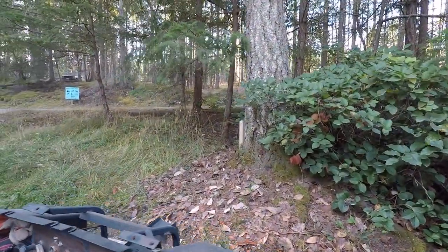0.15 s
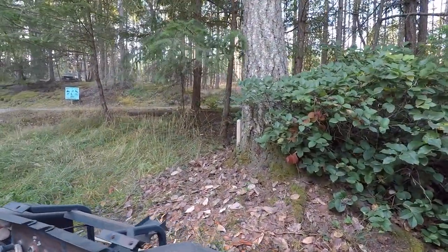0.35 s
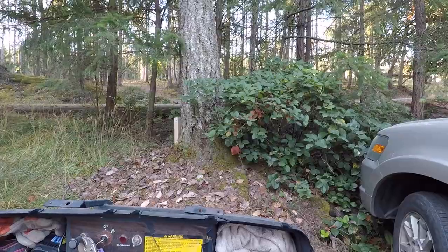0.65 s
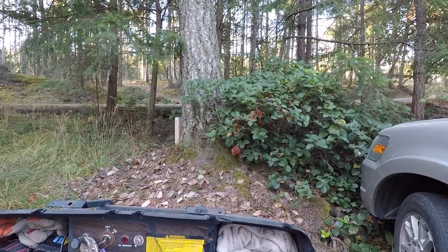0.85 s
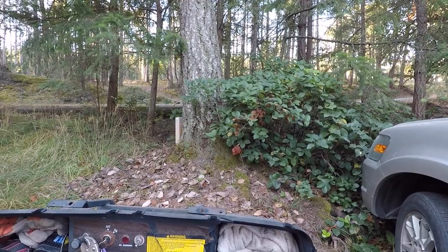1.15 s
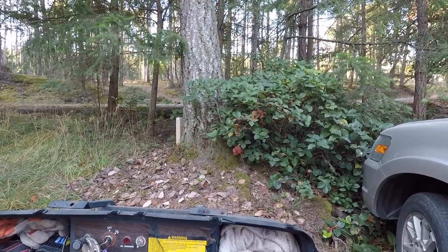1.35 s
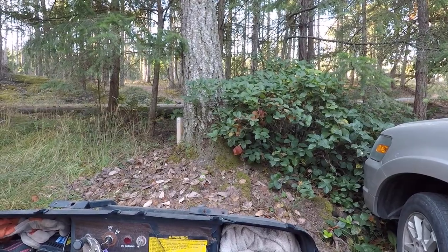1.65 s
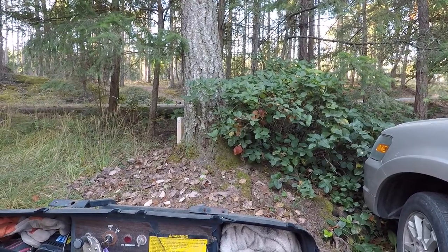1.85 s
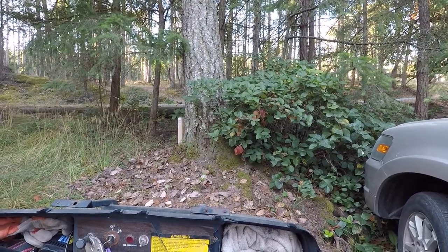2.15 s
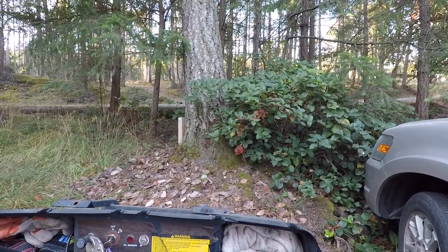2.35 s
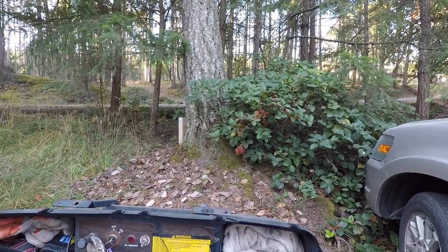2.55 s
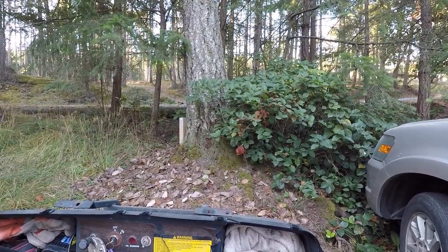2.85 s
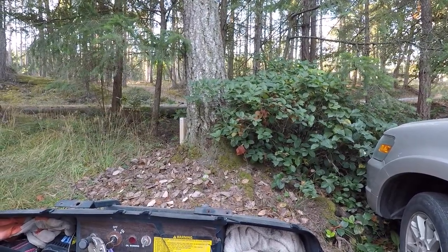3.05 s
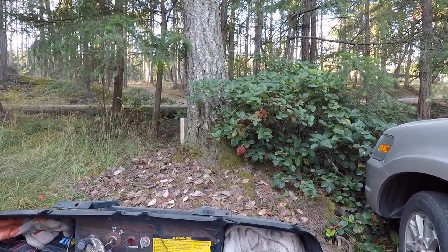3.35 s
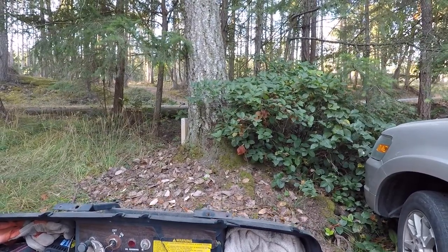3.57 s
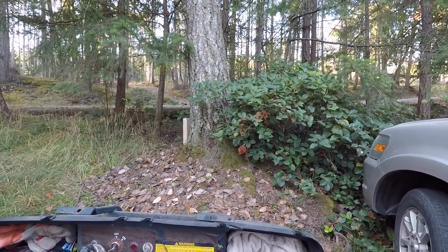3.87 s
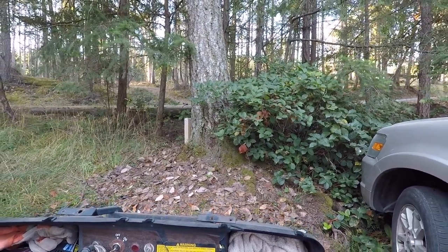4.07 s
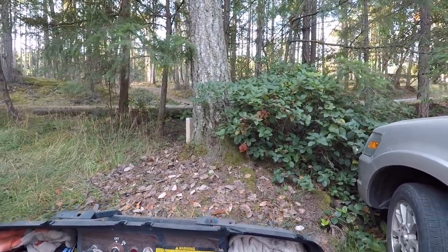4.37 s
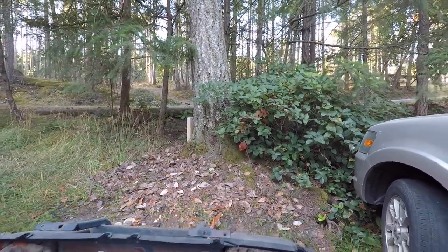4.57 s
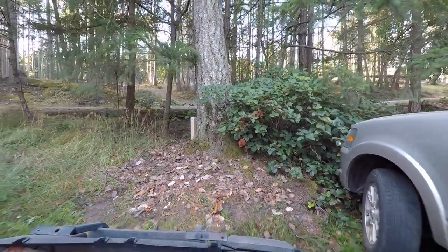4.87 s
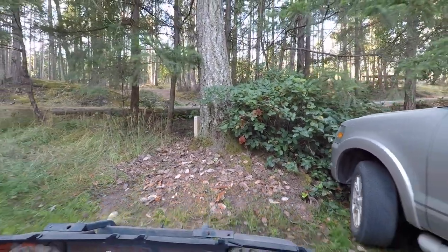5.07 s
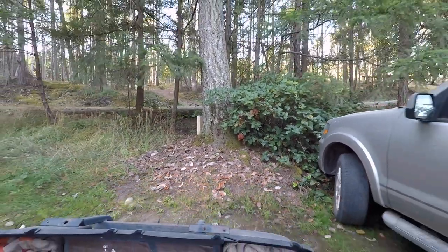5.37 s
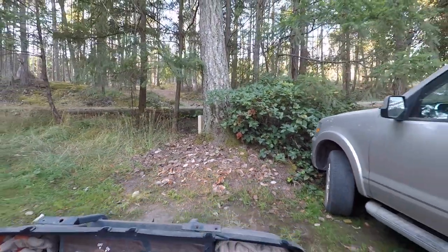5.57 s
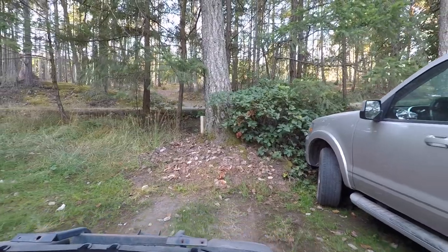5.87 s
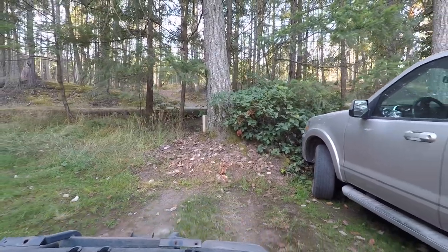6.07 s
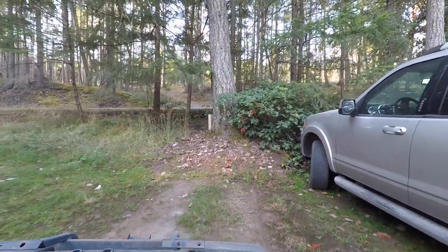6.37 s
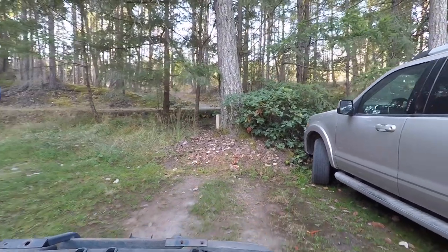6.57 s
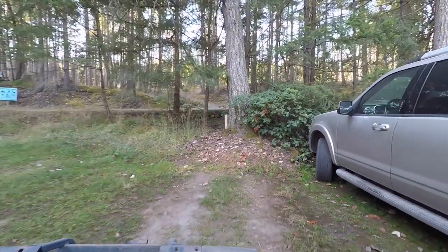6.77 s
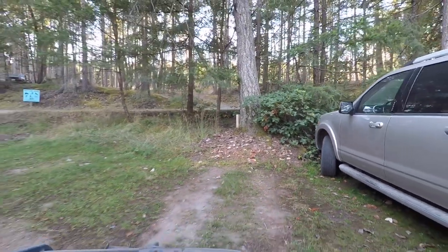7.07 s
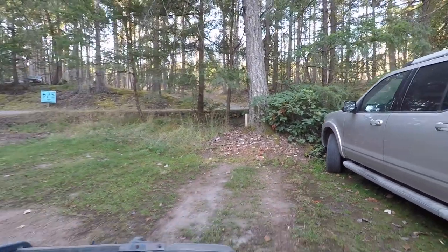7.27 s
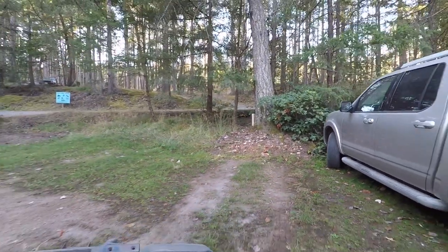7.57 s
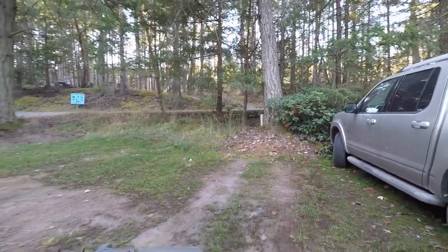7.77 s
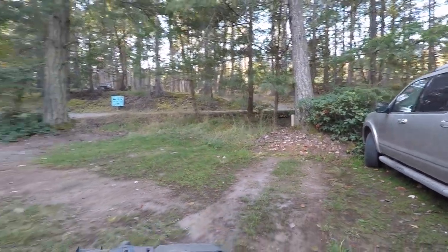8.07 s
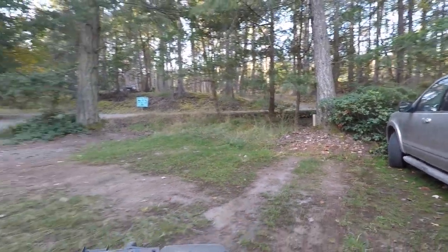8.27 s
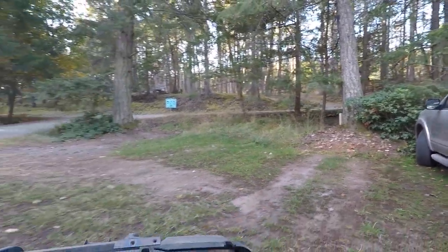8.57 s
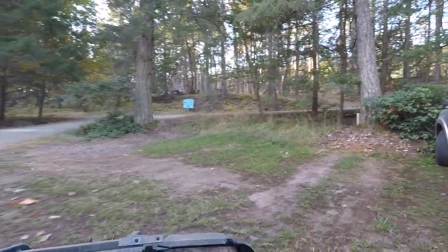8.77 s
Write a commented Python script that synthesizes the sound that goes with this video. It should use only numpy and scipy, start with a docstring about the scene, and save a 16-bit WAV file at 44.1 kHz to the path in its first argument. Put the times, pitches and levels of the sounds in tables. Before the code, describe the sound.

On-board, close stereo perspective on an electric cart in the woods. From 0 s a thin, wavering motor tone around 1 kHz hums quietly over faint low rumble. A soft thump at 0.6 s leads into hard clacks at 0.7 and 0.8; dull thumps follow at 1.1, 1.3 and 1.65. A short grinding whirr rises to a catch at 1.77, with another clack at 1.93. More thump and clacks come at 2.45-2.65, then a smoother whirr around 2.9. From 3 to 4.2 s the cart rolls off the bank: rapid knocks, bass jolts, cracking twigs, jingling fittings and hollow panel bonks, loudest near 4.05 and 4.5, with a panel shudder between. The motor fades by 5 s. A strong, uneven low rumble with gritty tyre scrub continues, easing after 7.3. Dry bright ticks run five per second from 4.25, every third stronger. Light plastic knocks come at 7.5-8.5; rumble softens to 8.9 s.

```python
"""A leafy bank beside a dirt track: an electric golf cart backs off the bank, heard from on board.
The motor, steady tones and housing resonances, sings under load; the drive takes up its slack in
thumps and clacks, made of damped frame modes. Then the cart rolls: shaped noise rumbles and crunches,
loose fittings rattle as bursts of bright noise, and something ticks in even time."""
import sys
import numpy as np
from scipy import signal
from scipy.fft import rfft, irfft, next_fast_len
from scipy.io import wavfile
from scipy.ndimage import uniform_filter1d, minimum_filter1d

SR = 44100
rng = np.random.default_rng(int(sys.argv[2]) if len(sys.argv) > 2 else 0)


def inscribe(sig):
    """Save sig as 16-bit PCM at rate SR to the path in sys.argv[1].

    A 1-D sig is mono; a 2-D sig holds one channel per row.
    Samples are clipped to [-1, 1] before scaling.
    """
    pcm = np.round(np.clip(np.atleast_2d(sig).T, -1, 1) * 32767)
    wavfile.write(sys.argv[1], SR, pcm.astype(np.int16))


N = 393327
TIME = np.arange(N) / SR

# The ride: (time [s], shaking of the chassis [dB], scrub of the tyres [dB])
RIDE = [(0, -31.5, -58.5), (0.399, -33, -58.5), (1.5, -29.5, -57), (1.849, -25, -49), (2.25, -31.5, -58.5),
        (2.799, -27.5, -55), (3.1, -19, -52), (4.18, -21, -49.5), (4.351, -16, -43.5),
        (4.548, -14.5, -47.5), (4.751, -16.5, -47.5), (5.7, -15, -51.5), (6.301, -15.5, -51),
        (7.349, -17, -57), (7.7, -19, -63), (8.5, -19, -60.5), (8.92, -22.5, -65)]
CRUISE_SHAKE_DB, CRUISE_SCRUB_DB = -15, -50
ROLL_START_S = 3.05  # chance hits from the ground begin here
# Blows on the frame: (time [s], relative level [dB], hardness [0 soft thump to 1 sharp clack],
# rattle of the fittings [dB])
BLOWS = [(0.567, -6.5, 0.044, -46.5), (0.696, -5, 0.86, -56), (0.791, -6, 0.76, -45),
         (0.907, -21.5, 0.32, -67), (1.144, -6.5, .02, -46), (1.34, -4.5, 0.062, -43.5),
         (1.648, -5.5, 0.027, -43), (1.705, -16.5, 1, -58), (1.769, -3.5, 0.65, -55.5),
         (1.93, -6, 0.89, -44.5), (2.451, -7, 0.05, -46), (2.585, -6.5, 0.82, -53), (2.646, -6, 0.8, -42.5),
         (2.809, -16, 0.33, -53), (3.134, -9, .2, -46.5), (3.252, -9.5, 0.79, -63),
         (3.381, -11.5, 0.28, -48), (3.494, -10.5, 0.88, -66), (3.613, -11.5, 0.53, -52),
         (3.723, -13.5, 0.28, -62), (3.838, -11.5, 0.39, -52), (4.377, -17.5, .05, -39)]
# Resonances of the body panels: (frequency [Hz], width [Hz], relative level [dB])
PANEL_MODES = [(219.2, 48, 1.5), (296.7, 76, -0.5), (360.4, 36, -5), (443.6, 60, -4.5)]
# Spectrum of clattering plastic: (frequency [Hz], relative level per Hz [dB])
CLATTER_SPECTRUM = [(200, -21), (400, 10.5), (600, 13), (900, -6), (1600, -6.5), (2200, -34), (3400, -39),
                    (5000, -42)]
# Spectrum of bright metal and splinters: (frequency [Hz], relative level per Hz [dB])
BRIGHT_SPECTRUM = [(1800, -1), (2700, -16), (3450, -7), (4700, -19), (6200, -7.5), (7600, 0), (8700, -10.5),
                   (12000, -26.5), (15000, -40)]


def amp(db):
    """Amplitude factor of a level in dB."""
    return 10 ** (np.asarray(db) / 20)


def evened(x):
    """Scales x to rms 1."""
    return x / np.sqrt(np.mean(x ** 2) + 1e-20)


def read(points, hz):
    """Reads a curve of (frequency, value) on a logarithmic frequency axis."""
    f, value = np.transpose(points)
    return np.interp(np.log(hz + 1), np.log(f + 1), value)


def follow(rows, axis=1):
    """Gain over time from one dB column of a curve."""
    rows = np.array(rows)
    return amp(np.interp(TIME, rows[:, 0], rows[:, axis]))


def add(mix, s, sound):
    """Lays a sound into the mix from time s on, cut at the end."""
    part = mix[:, max(round(s * SR), 0):][:, :sound.shape[-1]]
    part += sound[..., :part.shape[1]]


def colour(x, spectrum):
    """Shapes x by a spectrum that falls away steeply past its ends; rms 1."""
    size = next_fast_len(N)
    hz = np.fft.rfftfreq(size, 1 / SR)
    inside = np.clip(hz + 1, spectrum[0][0], spectrum[-1][0])
    octaves_outside = abs(np.log2((hz + 1) / inside))
    gain = amp(read(spectrum, hz) - 40 * octaves_outside)
    return evened(irfft(rfft(x, size) * gain, size)[:, :N])


def noise(spectrum):
    """Two independent channels of steady noise with the given spectrum."""
    return colour(rng.standard_normal((2, N)), spectrum)


def wander(per_s):
    """Chance curve of rms 1: straight lines between per_s random knots a second, held after 4000 knots."""
    knots = rng.standard_normal(4000)
    return evened(np.interp(TIME * per_s, np.arange(len(knots)), knots))


def resonate(x, hz, width):
    """A steep resonance, fixed or moving: shift hz to zero, smooth twice, shift back."""
    turn = np.exp(2j * np.pi * np.cumsum(hz * np.ones(N)) / SR)
    r = np.exp(-np.pi * width / SR)
    smooth = signal.lfilter([(1 - r) ** 2], [1, -2 * r, r * r], x / turn)
    return evened((turn * smooth).real)


def ringing(modes, drift=1):
    """Random shaking heard through a set of resonances."""
    shaking = rng.standard_normal((2, N))
    return sum(amp(db) * resonate(shaking, hz * drift, width) for hz, width, db in modes)


def ping(hz, t60, rise):
    """One struck mode dying away."""
    t = np.arange(SR // 3) / SR
    return amp(-60 * t / t60) * (1 - np.exp(-t / rise)) * np.sin(2 * np.pi * hz * t)


def bursts(rows, rise, t60, tail_db, tail_t60):
    """Envelope of hits (time, dB, ..): a quick crack plus a weaker tail; overlapping hits add in power."""
    t, power = np.arange(SR // 3) / SR, np.zeros((1, N))
    decay = amp(-60 * t / t60) + amp(tail_db - 60 * t / tail_t60)
    shape = (1 - np.exp(-t / rise)) * decay
    for s, db, *_ in rows:
        add(power, s, (amp(db) * shape) ** 2)
    return np.sqrt(power[0])


def scatter(per_s, db, spread_db):
    """Chance hits (time, dB) at a steady or changing rate."""
    hit, sizes = rng.random(N) < per_s / SR, rng.standard_normal(N)
    return list(zip(TIME[hit], db + spread_db * sizes[hit]))


def underway(hits):
    """Hits caused by the ground: none before the wheels roll, louder the harder the tyres scrub."""
    times, _, scrub_db = np.transpose(RIDE)
    return [(s, db + np.interp(s, times, scrub_db) - CRUISE_SCRUB_DB) for s, db in hits if s > ROLL_START_S]


def driven(cruise_db, by_shake, by_scrub):
    """Gain over time of a layer that grows, in dB per dB, with the shaking and the scrub of the ride."""
    shake = follow(RIDE, axis=1) / amp(CRUISE_SHAKE_DB)
    scrub = follow(RIDE, axis=2) / amp(CRUISE_SCRUB_DB)
    return amp(cruise_db) * shake ** by_shake * scrub ** by_scrub


def ports(pair, side, lean):
    """Two microphone ports: shaken together in the bass, against each other around 1 kHz."""
    size = next_fast_len(N)
    hz, (mid, other) = np.fft.rfftfreq(size, 1 / SR), rfft(pair, size)
    width, ratio = amp(read(side, hz)), amp(read(lean, hz)) ** 2
    # the part of the side signal that follows the mid makes one port louder
    shared = np.clip((ratio - 1) / (ratio + 1) * (1 + width ** 2) / (2 * width), -1, 1)
    apart = width * (shared * mid + 1j * np.sqrt(1 - shared ** 2) * other)
    return irfft(np.array([mid + apart, mid - apart]), size)[:, :N]


def grit(grains, crunches_per_s=24, count=4):
    """Grit gives way in small clumps; each grain size crunches in its own part of the treble."""
    # Crushed grit: (frequency [Hz], relative level per Hz [dB])
    grit_spectrum = [(2400, -10), (4700, -11.5), (5800, -6.5), (6800, -5.5), (7600, -0.5), (8860, -11.5),
                     (10200, -12.5), (11400, -20), (13300, -24.5), (15000, -38.5)]
    hz, fizz, out = np.fft.rfftfreq(N, 1 / SR), rfft(colour(grains, grit_spectrum)), 0
    centres = np.geomspace(grit_spectrum[0][0], grit_spectrum[-3][0], count)
    for share in np.eye(count):
        hits = scatter(crunches_per_s, db=-3.0, spread_db=4.5)
        clumps = evened(.5 + bursts(hits, rise=0.0027, t60=0.13, tail_db=-16.5, tail_t60=.25))
        out = out + clumps * irfft(fizz * np.interp(hz, centres, share), N)
    return out


def rolling():
    """Rough ground rocks the springs and shakes chassis and panels; the tyres scrub over dirt and crush grit."""
    # Spectra of the layers: (frequency [Hz], relative level per Hz [dB])
    sway_spectrum = [(15, -2.5), (32, 12.5), (48, 13), (68, 7), (92, 7), (120, -19.5)]
    rumble_spectrum = [(55, -9.5), (85, 3.5), (118, 5.5), (160, 3), (200, -4), (245, -17), (300, -27.5)]
    panel_spectrum = [(170, -16), (225, 2.5), (290, 0.5), (430, -2.5), (520, -5), (600, -14.5),
                      (780, -20.5), (950, -29.5), (1200, -31)]
    scrub_spectrum = [(500, 3.5), (750, 6), (1000, 3), (1280, -1), (1530, -2), (1750, -8.5), (2200, -16),
                      (2700, -28.5), (3450, -24.5), (4300, -39)]
    sway = driven(cruise_db=-18, by_shake=0.55, by_scrub=0.51) * noise(sway_spectrum)
    rumble = driven(cruise_db=-14, by_shake=0.95, by_scrub=0.067) * noise(rumble_spectrum)
    jolts = wander(per_s=51)
    # each panel booms up and dies down on its own
    booms = 0
    for hz, width, db in PANEL_MODES:
        mode = ringing([(hz, width / 2, db)], drift=1 + .03 * wander(per_s=4))
        booms = booms + amp(4.0 * wander(per_s=9)) * mode
    panels = amp(-0.5) * noise(panel_spectrum) + amp(-6.0) * evened(booms)
    drone = amp(1.4 * jolts) * driven(cruise_db=-24, by_shake=0.89, by_scrub=0.13) * panels
    # single grains, 9000 a second, over a thin hiss
    sizes = amp(0.64 * np.minimum(rng.exponential(1, N), 4))
    grains = rng.standard_normal((2, N)) * (0.15 + sizes * (rng.random(N) < 9000 / SR))
    scrub_level = driven(cruise_db=-43, by_shake=0.029, by_scrub=0.76)
    scrub = amp(0.9 * jolts + 2.0 * wander(per_s=63)) * scrub_level * colour(grains, scrub_spectrum)
    crunch = driven(cruise_db=-64, by_shake=.03, by_scrub=0.55) * grit(grains)
    return sway + rumble + drone + scrub + crunch


def judder():
    """The body panels shudder briefly as the wheels come off the bank."""
    # Strength of the shudder: (time [s], level [dB])
    shudder = [(4.2, -49.5), (4.26, -23.5), (4.36, -21.5), (4.55, -23.5), (4.62, -24.5), (4.72, -57.5)]
    dropping = (TIME > shudder[0][0]) & (TIME < shudder[-1][0])
    return dropping * follow(shudder) * ringing(PANEL_MODES)


def suspension(cycles=0.82):
    """Each root or rut swings the damped springs one way and back."""
    # The biggest bumps: (time [s], relative level [dB], bounce frequency [Hz])
    bumps = [(1.68, -10, 57.5), (1.914, -7.5, 55.4), (2.912, -9, 55.7), (2.995, -8.5, 55),
             (3.086, -5.5, 85.5), (3.345, -2.5, 84.5), (3.5, -3.5, 46.7), (3.593, -4, 87),
             (3.733, -3, 51.6), (3.95, -1.5, 55), (4.109, -4.5, 89.5), (4.157, -5, 58)]
    t, out = np.arange(-SR // 10, SR // 10) / SR, np.zeros((2, N))
    for s, db, hz in bumps:
        swing = np.exp(-(t * hz / cycles) ** 2) * np.sin(2 * np.pi * hz * t)
        add(out, s + t[0], amp(db - 3.0) * swing)
    return out * amp([[-.6], [.6]])  # a little stronger on the right


def ticking(count=3, stop_t60=0.017):
    """Dry, bright ticks in even time, every third strong; each scratch swells, stops and trails off."""
    # Ticks placed one by one, each a short scratch of bright noise: mostly the strong ones, plus two faint
    # extra # ticks on weak beats: (time [s], relative level [dB], length [s])
    placed = [(4.246, -38.5, 0.01), (4.84, -40, 0.0065), (5.437, -42.5, 0.019), (6.039, -40.5, 0.01),
              (6.442, -53, 0.0025), (6.637, -43.5, 0.022), (7.24, -39, 0.004), (7.837, -42, 0.023),
              (8.439, -39, 0.0058), (8.846, -58, .012)]
    # Colour of a tick: (frequency [Hz], relative level per Hz [dB])
    tick_spectrum = [(1200, 3.5), (2200, 2), (3500, -2), (5000, 0.5), (7600, 3.5), (9500, -2), (13000, -8),
                     (15500, -24)]
    first_s, period_s = 4.243, .1999
    weak_db, weak_length_s = -56.5, 0.009
    tail_db, tail_t60 = -7, .14
    weak = []
    for k, s in enumerate(np.arange(first_s, N / SR, period_s)):
        if k % count:
            weak.append((s, weak_db + 1.5 * rng.standard_normal(), weak_length_s))
    t, level = np.arange(SR // 5) / SR, np.zeros((1, N))
    for s, db, length in placed + weak:
        after = np.maximum(t - length, 0)
        fade = np.maximum(amp(-60 * after / stop_t60), amp(tail_db - 60 * after / tail_t60))
        add(level, s, amp(db) * np.minimum(2 * t / length, 1) * fade)
    # one lone, thin click early on: (time [s], relative level [dB])
    level = level + bursts([(0.4485, -46)], rise=.0001, t60=.005, tail_db=-30, tail_t60=.02)
    clicks = rng.standard_normal((2, N)) * (0.99 + (rng.random(N) < 5000 / SR))
    return level * evened(amp(2.8 * wander(per_s=500))) * colour(clicks, tick_spectrum)


def stones():
    """Twigs and stones snap, the big ones with a short ring of their own: thick on the bank, sparse after."""
    # The loudest twigs and stones under the tyres: (time [s], relative level [dB], ring [Hz])
    snaps = [(2.955, -32, 1820), (2.993, -33, 1670), (3.098, -32.5, 1520), (3.13, -30, 1580),
             (3.227, -34, 1750), (3.239, -36.5, 1530), (3.271, -29, 1440), (3.379, -29.5, 1550),
             (3.465, -33, 1790), (3.503, -31.5, 1385), (3.586, -32, 1520), (3.612, -32.5, 1700),
             (3.698, -35.5, 1810), (3.726, -32, 1430), (3.839, -30, 1430), (3.920, -32.5, 1850),
             (4.034, -33.5, 1760), (4.130, -34.5, 1500), (4.163, -32, 1290), (4.47, -34.5, 1550),
             (4.564, -35.5, 1470), (5.375, -37.5, 1570), (6.308, -41.5, 1550), (7.432, -40.5, 1640)]
    # Colour of a crack: (frequency [Hz], relative level per Hz [dB])
    crack_spectrum = [(500, -4), (1100, 9), (1600, 4.5), (2400, -12.5), (3400, -17.5), (4600, -31),
                      (7500, -31)]
    bank_end_s, bank_per_s, track_per_s = 5.2, 9.2, 0.7
    ring_db, ring_t60 = -6, .055
    splinter_db, splinter_db_per_octave, splinter_hz = -22.5, 27.5, 1760
    per_s = np.where(TIME < bank_end_s, bank_per_s, track_per_s)
    crackle = evened(amp(3.5 * wander(per_s=300)))
    small = underway(scatter(per_s, db=-39.5, spread_db=2.5))  # level at cruising scrub
    crack_level = bursts(list(snaps) + small, rise=0.005, t60=0.065, tail_db=-14.0, tail_t60=0.09)
    cracks = amp(-0.5) * crack_level * noise(crack_spectrum)
    # thin twigs ring higher and splinter more brightly
    splinters = [(s, db + splinter_db_per_octave * np.log2(hz / splinter_hz)) for s, db, hz in snaps]
    splinter_level = bursts(splinters, rise=0.0022, t60=0.059, tail_db=-24.5, tail_t60=.1)
    out = crackle * (cracks + amp(splinter_db) * splinter_level * noise(BRIGHT_SPECTRUM))
    for s, db, hz in snaps:
        add(out, s, amp(db + ring_db) * ping(hz, ring_t60, rise=0.0016))
    return out


def fittings(bounce_s=0.0074, bounce_db=-2):
    """Loose metal parts chatter after blows and on rough ground: each strikes, bounces once and rings."""
    # The fittings also jangle on their own: (time [s], relative level [dB])
    rattles = [(4.100, -50.5), (4.279, -41.5), (4.396, -46), (4.491, -47.5), (4.569, -50), (4.644, -49),
               (4.716, -51.5), (5.374, -52), (5.965, -54.5), (7.440, -57.5)]
    # Ring of the metal: (frequency [Hz], width [Hz], relative level [dB])
    metal_modes = [(3500, 140, -5.5), (8460, 79, -6.5), (7500, 110, -4), (8200, 230, -10)]
    lag_s = 0.01  # delay after the hardest clack; softer blows are answered sooner
    shaken = [(s + lag_s * hard ** 2, db) for s, _, hard, db in BLOWS] + list(rattles)
    shaken += underway(scatter(per_s=4, db=-62.5, spread_db=4.5))  # faint chance rattles
    strikes = shaken + [(s + bounce_s, db + bounce_db) for s, db in shaken]
    clink_level = bursts(strikes, rise=0.00042, t60=0.041, tail_db=-15.0, tail_t60=0.31)
    ring_level = amp(-18.5) * bursts(shaken, rise=0.0017, t60=0.22, tail_db=-6.5, tail_t60=0.46)
    return clink_level * noise(BRIGHT_SPECTRUM) + ring_level * ringing(metal_modes)


def bodywork(flex_s=0.0025):
    """Plastic panels clatter after blows, most after hard ones; a cover knocks and hollow panels flex."""
    # A loose plastic cover knocks: (time [s], relative level [dB], brightness [dB per octave])
    cover_knocks = [(0.791, -29, 3), (1.933, -23.5, 1.5), (2.648, -23.5, -1.5), (7.513, -44, 10),
                    (7.977, -33, -1.5), (8.302, -39.5, -11.5), (8.488, -37.5, 2)]
    # Modes of the cover: (frequency [Hz], t60 [s], relative level [dB])
    cover_modes = [(560, .03, 4.5), (720, 0.033, -5.5), (876, 0.033, 6.5), (1514, 0.081, -9),
                   (1690, 0.04, -5)]
    # A hollow panel flexes and rings: (time [s], relative level [dB], pitch [Hz], t60 [s])
    bonks = [(1.384, -16, 192.6, .14), (2.812, -18.5, 208, .13), (3.136, -22, 441, 0.11),
             (3.139, -13.5, 211.5, .14), (3.381, -31.5, 870, 0.14), (3.385, -12.5, 207.5, .12),
             (3.614, -31.5, 870, 0.12), (3.828, -28, 725, 0.065), (3.842, -9.5, 216.3, 0.09),
             (4.047, -1.5, 310.5, 0.075), (4.521, -2, 242, 0.053)]
    knocks = [(s, db - 25 + 6 * hard) for s, db, hard, _ in BLOWS]
    out = bursts(knocks, rise=0.001, t60=0.04, tail_db=-18, tail_t60=0.19) * noise(CLATTER_SPECTRUM)
    for s, db, bright in cover_knocks:
        for hz, t60, mode_db in cover_modes:
            level = amp(db + mode_db + bright * np.log2(hz / 1000))
            detune = 1 + 0.016 * rng.standard_normal()
            add(out, s, level * ping(hz * detune, t60, rise=0.003))
    for s, db, hz, t60 in bonks:
        add(out, s, amp(db + 5.0) * ping(hz, t60, flex_s))
    return out


def scrapes():
    """The gear teeth scrape as the slack runs out: each scrape swells and stops at the catch."""
    # The catches: (time [s], level [dB])
    catches = [(0.704, -18), (1.776, -15), (2.593, -17)]
    swell_s, stop_s = .008, .007
    level = 0
    for s, db in catches:
        level = level + amp(db) * np.exp(-np.maximum((s - TIME) / swell_s, (TIME - s) / stop_s))
    return level * noise(CLATTER_SPECTRUM)


def gears():
    """A short rising whirr whenever the motor spins free: grinding in the first run, smoother in the second."""
    # Gears spinning up, one table a run: (time [s], pitch [Hz], level [dB])
    spin_ups = [
        [(1.61, 409.6, -39), (1.69, 483, -31.5), (1.745, 612, -32.5), (1.77, 690, -33)],
        [(2.84, 483, -43), (2.905, 553, -30), (2.96, 675, -33), (3.01, 740, -37), (3.11, 842, -44)],
    ]
    out, waver, rough = np.zeros((2, N)), 0.05 * wander(per_s=460), 4.0 * wander(per_s=160)
    for rows, roughness in zip(spin_ups, (1, 0.53)):  # 0 clean to 1 grinding
        s, hz, db = np.transpose(rows)
        t = np.arange(s[0], s[-1], 1 / SR)
        turns = np.cumsum(np.interp(t, s, hz) * (1 + roughness * waver[:len(t)])) / SR
        level = amp(np.interp(t, s, db) + roughness * rough[:len(t)])
        fade = signal.windows.tukey(len(t), .15)
        add(out, s[0], level * fade * np.sqrt(2) * np.sin(2 * np.pi * turns))
    return out


def motor():
    """The speed controller's steady tones, and the housing singing under a wavering load."""
    # Straining motor: (time [s], relative switching tones [dB], housing [dB])
    strain = [(0, -40, -42.5), (1.5, -37.5, -44.5), (3, -36.5, -42), (3.9, -38, -42), (4.5, -40.5, -53.5),
              (4.9, -50.5, -70), (8.92, -58, -62)]
    # Switching tones: (frequency [Hz], relative level [dB])
    switching = [(1000, -3.5), (2000, -25.5)]
    # Resonances of the housing: (frequency [Hz], width [Hz], relative level [dB])
    housing_modes = [(608.6, 110, 2), (1105, 95, -3.5), (1148, 52, -5.5), (1692, 59, -20.5),
                     (2060, 19, -28)]
    whistle_hz, whistle_db = 14626, -50.5  # thin electronic whistle, relative to the housing's level
    tones = sum(amp(db) * np.sqrt(2) * np.sin(2 * np.pi * hz * TIME) for hz, db in switching)
    whistle_level = amp(whistle_db + 3 * wander(per_s=6))
    whistle = whistle_level * np.sqrt(2) * np.sin(2 * np.pi * whistle_hz * TIME)
    housing = ringing(housing_modes, drift=1 + 0.0085 * wander(per_s=7))
    tone_level = amp(-5.5 + 1.9 * wander(per_s=7.2)) * follow(strain, axis=1)
    return tone_level * tones + follow(strain, axis=2) * (housing + whistle)


def frame(soft_travel=0.02, hard_travel=0.095, swell_cycles=0.2, detune_share=.016):
    """Blows shove and ring the frame; bending waves bring the high modes first and the low ones last."""
    # Frame and panels: (frequency [Hz], t60 [s], level when thumped [dB], level when clacked [dB])
    frame_modes = [(63.9, 0.41, 1.5, -11), (97.3, 0.32, -23, 14), (112.5, 0.55, -7.5, -5.5),
                   (171, 0.18, 3.5, -12), (201.9, 0.17, -1.5, -6), (284.4, 0.2, -15, -3),
                   (346.7, 0.11, -7.5, -2), (455.7, 0.093, -5.5, -3.5), (486, 0.062, -14, 2.5),
                   (583, 0.057, -13, -3.5), (761, 0.031, -20, -7.5)]
    push_hz, push_cycles, push_lag_s, push_db = 181, 0.7, 0.0051, -0.5
    t, out = np.arange(SR // 2) / SR, np.zeros((2, N))
    hz, t60, soft_db, hard_db = np.array(frame_modes).T[:, :, None]
    slowness = hz ** -.5 - hz.max() ** -.5
    # a thump begins with one solid shove
    turns = (t - push_lag_s) * push_hz
    push = -amp(push_db) * np.exp(-(turns / push_cycles) ** 2) * np.sin(2 * np.pi * turns)
    detunes = rng.standard_normal((len(BLOWS), len(frame_modes), 1))
    for (s, db, hard, _), detune in zip(BLOWS, detunes):
        travel = soft_travel + hard * (hard_travel - soft_travel)
        age = np.maximum(t - travel * slowness, 0)  # time since each mode arrived
        fade = amp(-60 * age / t60) * (1 - np.exp(-age * hz / swell_cycles))
        level = amp(soft_db + hard * (hard_db - soft_db))
        tones = np.sin(2 * np.pi * hz * (1 + detune_share * detune) * age)
        ring = (level * fade * tones).sum(0)
        add(out, s, amp(db) * (ring / abs(ring).max() + .5 * (1 - hard) * push))
    return out


def scene():
    """Places the drive, the whirr, the rolling and the ticks before the two ports."""
    # Width of the stereo image: (frequency [Hz], side to mid [dB])
    drive_side = [(90, -20), (200, -17.5), (380, -12), (700, 3.5), (1290, 8), (2380, 0), (4400, 0),
                  (8120, 2.5), (15000, -3.5)]
    roll_side = [(60, -18.5), (110, -21.5), (200, -15.5), (380, -10), (700, 2), (1290, 5), (2380, -1),
                 (4400, -0.5), (8120, 1.5), (15000, -1.5)]
    # Lean of the stereo image: (frequency [Hz], left to right [dB])
    drive_lean = [(80, -1), (200, -2), (380, -15), (700, 1.5), (1290, -1.5), (2380, 0), (4400, -3),
                  (8120, -13), (15000, 0)]
    roll_lean = [(80, -1.2), (200, -1.5), (380, -4.5), (700, -12), (1290, -2.5), (2380, -2.5), (4400, -1),
                 (8120, -9.5), (15000, 5.5)]
    machinery = motor() + frame() + scrapes() + bodywork() + fittings() + stones()
    drive = ports(machinery, drive_side, drive_lean)
    whirr = gears() * amp([[-12], [4]])  # the gearbox sits to the right
    ride = ports(rolling() + judder(), roll_side, roll_lean)
    return drive + whirr + suspension() + ride + ticking()


def record(dry):
    """A quick limiter holds the loudest peaks down; then the band limit."""
    ceiling, edge_hz = 0.87, 15750
    allowed = np.minimum(1, ceiling / (abs(dry).max(0) + 1e-9))
    held = minimum_filter1d(allowed, size=401)
    gain = uniform_filter1d(uniform_filter1d(held, size=201), size=201)
    lowpass = signal.firwin(511, edge_hz, window=("kaiser", 9), fs=SR)
    return signal.oaconvolve(dry * gain, lowpass[None], "same")


dry = scene()
out = record(dry)
inscribe(out)
```